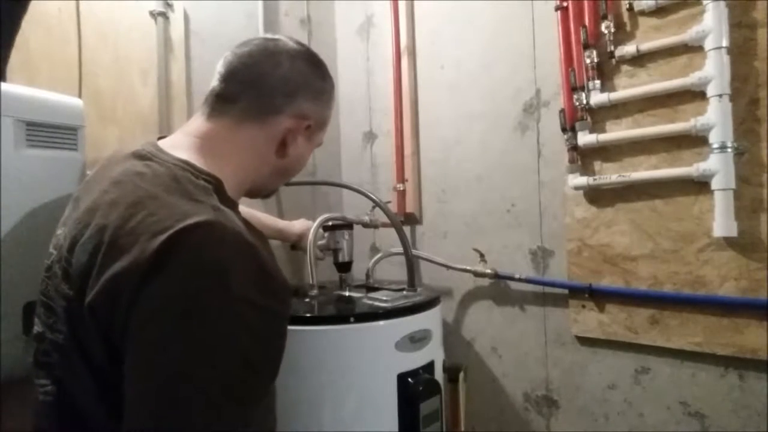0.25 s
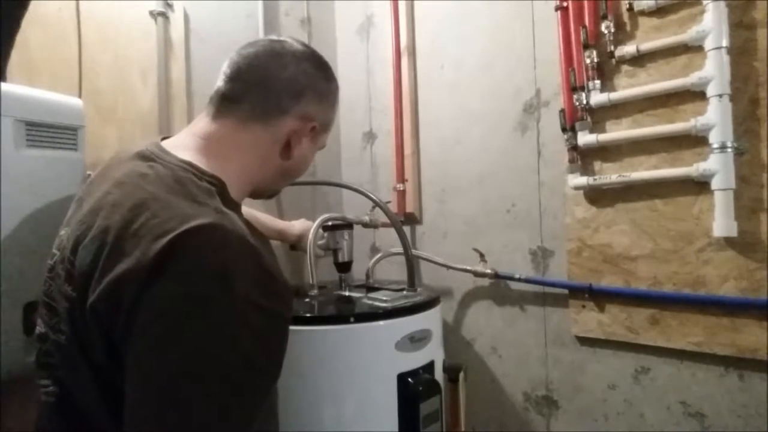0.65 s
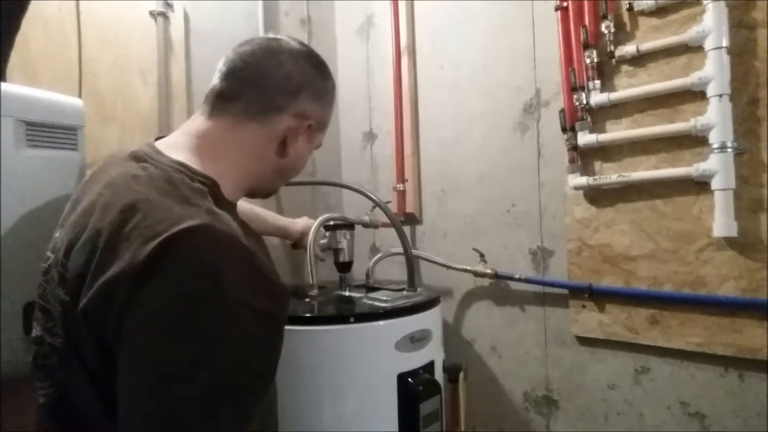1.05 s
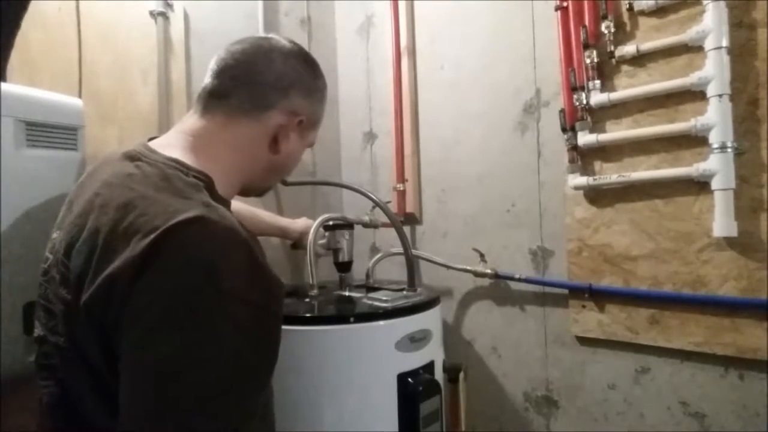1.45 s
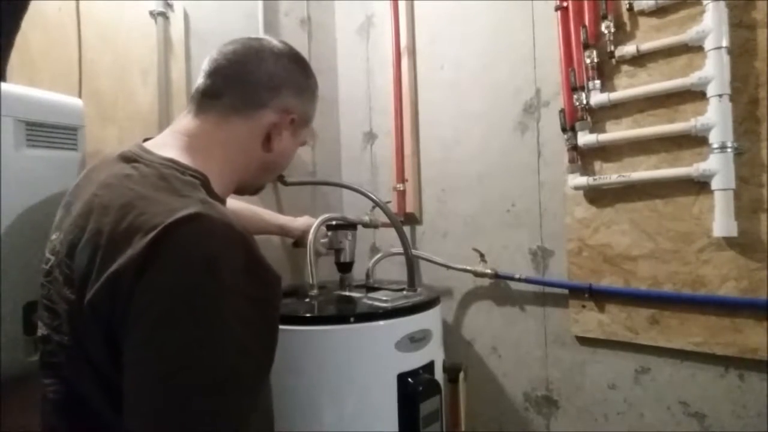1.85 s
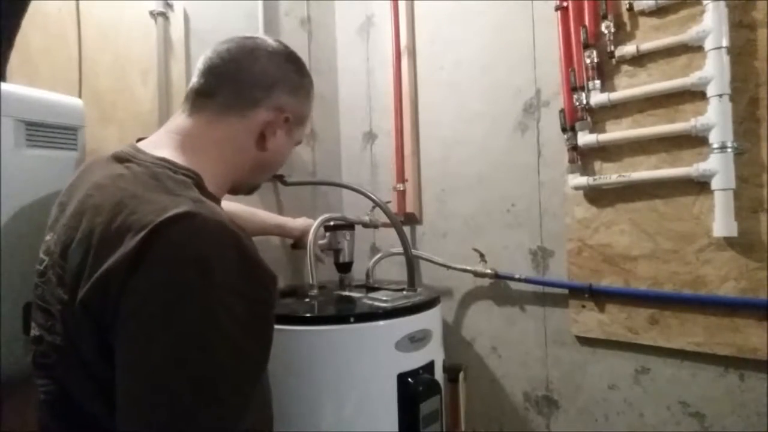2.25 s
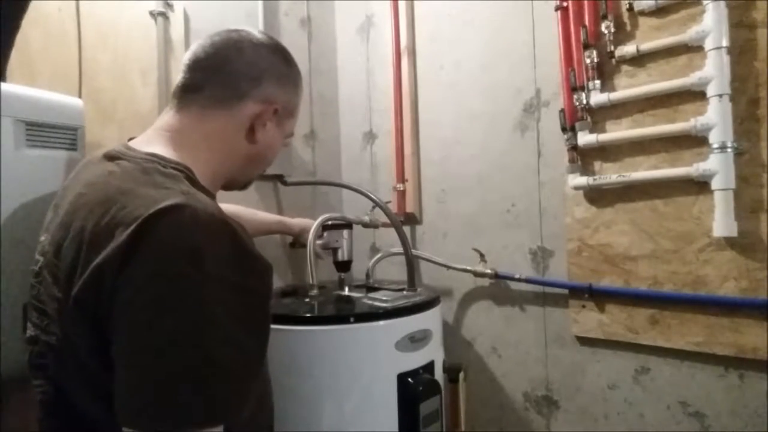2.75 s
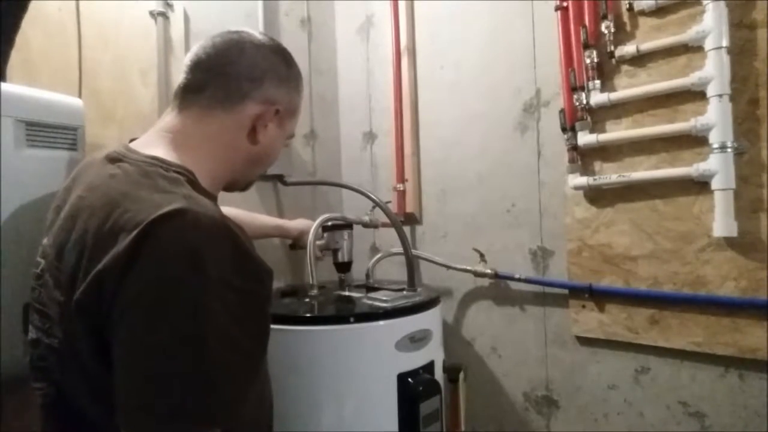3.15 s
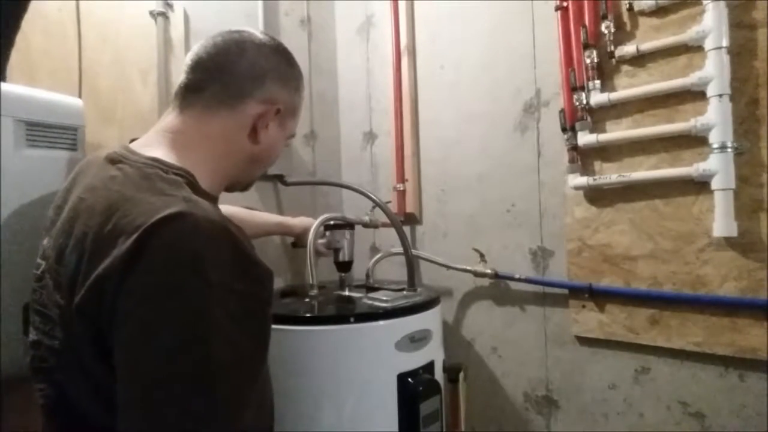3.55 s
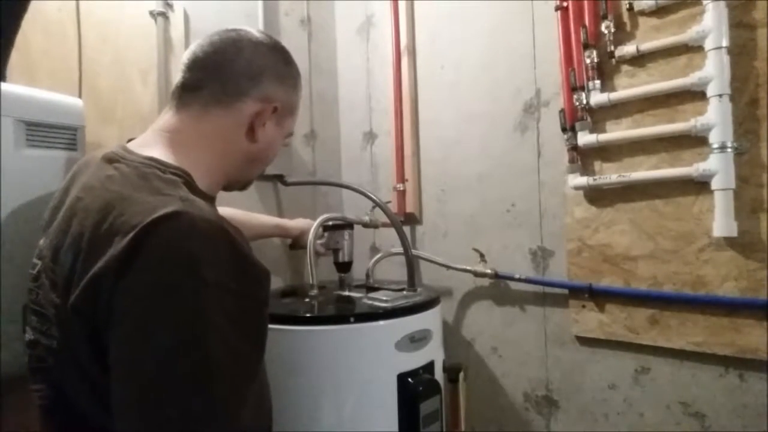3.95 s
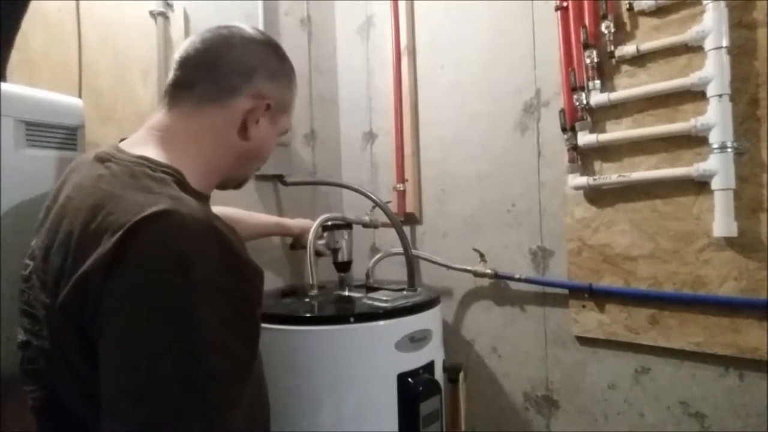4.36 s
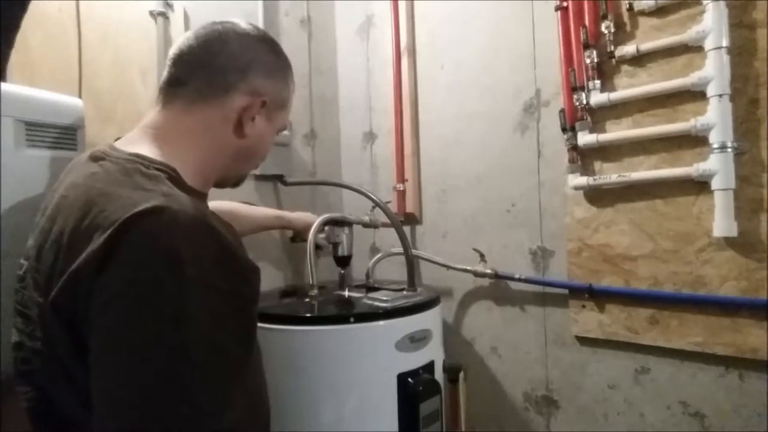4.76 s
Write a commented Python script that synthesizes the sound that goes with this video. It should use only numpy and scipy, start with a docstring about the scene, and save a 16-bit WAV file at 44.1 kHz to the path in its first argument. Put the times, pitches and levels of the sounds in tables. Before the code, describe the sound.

Faint, steady room noise fills a concrete basement with a short echo. At about 0.45 seconds a nearby air impact wrench starts with a jolt: hissing exhaust, a rising rotor growl and chattering hammer blows, while a rusty rod grinds in the top of a metal water tank. It stops near 1 second with a clack and a rattle. A second burst runs from 1.5 to 2.1 seconds, ending in two hard clacks and a dull socket scuff. The tank shell hums low and fades through the pause, with a faint trigger tick at 2.4 and a soft scuff at 3 seconds. Two quick blips come at 3.4 and 4 seconds, each coasting down with several sharp clacks as the loose rod rattles against its opening. A last small rattle comes at about 4.45, and the hum dies away by 5 seconds.

```python
"""Concrete basement: an air impact wrench spins a metal rod out of a water tank's top, in four bursts.
Trigger held: the exhaust hisses, the rotor growls, the hammer chatters. Released: the rotor coasts
down with a few clacks. The rod grinds in its rusty thread and rattles as it slows; the tank shell
hums on between bursts. Socket scuffs and trigger ticks sound faintly over still air."""
import sys
import numpy as np
from scipy import signal
from scipy.fft import rfft, irfft, next_fast_len
from scipy.io import wavfile

SR = 44100
rng = np.random.default_rng(int(sys.argv[2]) if len(sys.argv) > 2 else 0)


def unload_wav(signal):
    """Save mono or channel-first audio to the path in sys.argv[1] as 16-bit WAV at rate SR, clipped to [-1, 1]."""
    wavfile.write(
        sys.argv[1],
        SR,
        np.round(np.clip(np.atleast_2d(signal).T, -1, 1) * 32767).astype(np.int16),
    )


N = 221117
TIME = np.arange(N) / SR

# Event and mode levels are relative within each table.
# trigger pulls: on_s, off_s, flow_db, spin_up_s, top_hz, coast_s, jolt_db
TRIGGER_PULLS = [(0.445, 0.94, -19, 0.13, 481, .07, -16), (1.458, 2.065, -19, 0.094, 477.5, .07, -17),
                 (3.439, 3.583, -21.5, .06, 349, .17, -16.5),
                 (3.97, 4.112, -19.5, 0.060258, 350, .17, -19.5)]
# hard hammer clacks: start_s, level_db
HAMMER_CLACKS = [(.508, 3.5), (.602, 4.5), (.991, 4.5), (2.045, 11.5), (2.148, 7.5), (3.545, 1.5),
                 (3.600, 6.5), (3.651, 9), (4.137, 6.5), (4.193, 7), (4.272, 6), (4.419, -27.5),
                 (4.445, -21.5)]
# socket scuffs on the rod: start_s, level_db
SOCKET_SCUFFS = [(0.062, -60.5), (2.099, -27.5), (2.997, -49.5), (4.68, -66.5), (4.995, -70)]
# trigger springs back: start_s, level_db
TRIGGER_TICKS = [(1.167, -50), (2.365, -54)]
# loose rod drops against its port: start_s, level_db
ROD_DROPS = [(1.018, -3.5), (3.683, 5.5), (4.168, 0.5), (4.207, 0.5), (4.297, -1.5), (4.446, -9)]
# rod turns: start_s, stop_s, full_db, growth_db, rise_s
ROD_TURNS = [(0.453, 0.994, -25, 16.5, 0.39), (1.456, 2.15, -28.5, 4.5, 0.085),
             (3.446, 3.723, -35.5, 9.5, 0.15), (3.979, 4.28, -32.5, 11, 0.13)]
# thread binds: centre_s, boost_db
THREAD_BINDS = [(.53, 4.5), (.88, 2), (1.65, 5), (1.77, 6.5), (2.095, 1.5), (4.205, 3.5)]
# shell booms as the rod jerks: start_s, level_db
SHELL_BOOMS = [(.45, -35.5), (.655, -31.5), (.885, -35), (1.46, -35), (1.675, -38.5), (2.15, -33.5),
               (3.435, -38.5), (4.15, -41.5), (4.255, -36.5)]
# shell rings after a burst or a reseating of the socket: start_s, level_db, fade_db_per_s
SHELL_RINGS = [(1.0, -39, 59), (2.2, -39.5, 17.5), (3.06, -53.5, -1), (3.76, -46.5, 34), (4.38, -46, 30.5)]

# higher tank shell modes: freq_hz, level_db, t60_s
SHELL_MODES = [(255, -12, 0.67), (367, -6.5, 0.81), (375.3, -24, 2.2), (447, -17, 0.69), (505.8, 4.5, 0.23),
               (634, 3, 0.4), (704, -5.5, 0.18), (877, -46.5, 3), (1057, -4.5, .3), (1442, -0.5, .2)]
# trigger spring modes: freq_hz, level_db, t60_s
SPRING_MODES = [(5450, -6.5, .16), (5560, -1, .14), (5840, 4, .12), (6471, -25.5, .1)]

# still air: freq_hz, gain_db
AIR_SPECTRUM = [(12, -26), (25, -12), (45, -1.5), (65, -7), (100, -3.5), (200, -8.5), (300, -15.5),
                (450, -19), (700, -29), (1000, -34), (3000, -43.5), (16000, -44)]
# socket scuff: freq_hz, gain_db
SCUFF_SPECTRUM = [(60, -14), (250, -9.5), (420, 8), (520, 9.5), (750, -4.5), (1200, -19.5), (2500, -34),
                  (6000, -44), (16000, -62)]
# exhaust jet: freq_hz, gain_db
EXHAUST_SPECTRUM = [(40, -26.5), (150, -11.5), (400, -13.5), (1000, -10), (2100, -8.5), (2900, -3.5),
                    (4300, -11), (5100, -5.5), (5700, -3), (6500, -5.5), (8000, -0.5), (10000, 3),
                    (12500, 1.5), (16000, -1)]
# jolted lid: freq_hz, gain_db
JOLT_SPECTRUM = [(20, -37.5), (40, -18.5), (65, -7), (110, 2), (200, -6), (330, -23), (1000, -37),
                 (16000, -68)]
# rod and thread: freq_hz, gain_db
THREAD_SPECTRUM = [(40, -34), (100, -11), (190, -4), (310, -16), (440, 3), (510, -1), (580, -3.5),
                   (800, -4), (1500, -7), (2200, -14), (3000, -14), (6000, -27), (16000, -32)]
# steel contact: freq_hz, gain_db
STEEL_SPECTRUM = [(100, -19), (500, -13.5), (1500, -7.5), (2900, -2), (4200, -4), (5700, -1), (7500, 0.5),
                  (10500, 4.5), (16000, 6)]
# rod against its port: freq_hz, gain_db
RATTLE_SPECTRUM = [(60, -14.5), (250, -13), (450, 3.5), (800, 0), (1500, -1.5), (2200, -3), (3500, -18),
                   (7000, -11.5), (16000, -22)]

# basement decay: freq_hz, t60_s
ROOM_DECAY = [(100, 0.32), (500, 0.29), (1500, 0.23), (4000, 0.17), (10000, 0.22), (16000, .17)]
# left-right likeness of diffuse sound: freq_hz, correlation
STEREO_LIKENESS = [(120, 0.38), (300, .65), (600, 0.29), (1500, .2), (4000, 0.061), (16000, 0)]
# body shadow: freq_hz, left_minus_right_db
SHADOW_BALANCE = [(120, -1), (450, 6), (700, 1.5), (1000, -1), (1350, 6.5), (2100, 2.5), (3100, 5.5),
                  (4700, 12.5), (5800, 14.5), (7500, 6.5), (9500, 1), (12000, -1.5), (15500, 4)]


def from_db(db):
    """Decibels to gain."""
    return 10 ** (np.asarray(db) / 20)


def rms_one(x):
    """Scale to rms 1."""
    return x / np.sqrt(np.mean(x ** 2) + 1e-20)


def at_hz(table, hz):
    """Interpolate a table over log frequency."""
    freqs_hz, values = np.transpose(table)
    return np.interp(np.log(np.maximum(hz, 1)), np.log(freqs_hz), values)


def drift(rate_hz):
    """Random wander, rms 1."""
    knots = rng.standard_normal(int(rate_hz * N / SR) + 2)
    return rms_one(np.interp(TIME * rate_hz, np.arange(len(knots)), knots))


def colour(x, spectrum):
    """Minimum-phase filter; white noise keeps its power."""
    length = x.shape[-1]
    size = 2 * next_fast_len(length // 2 + SR // 10)
    gain = rms_one(from_db(at_hz(spectrum, np.fft.rfftfreq(size, 1 / SR))))
    cepstrum = irfft(np.log(gain))
    cepstrum[1:size // 2] *= 2
    cepstrum[size // 2 + 1:] = 0
    return irfft(rfft(x, size) * np.exp(rfft(cepstrum, size)))[..., :length]


def ring(force, hz, t60_s):
    """One mode: a unit click starts a decaying sine of height 1."""
    radius, step_rad = from_db(-60 / (t60_s * SR)), 2 * np.pi * hz / SR
    feedback = [1, -2 * radius * np.cos(step_rad), radius ** 2]
    return signal.lfilter([0, np.sin(step_rad)], feedback, force + 1e-18)


def clicks(times_s, levels_db):
    """Hard contacts as single impulses."""
    out = np.zeros(N)
    out[np.clip(np.round(np.asarray(times_s) * SR).astype(int), 0, N - 1)] = from_db(levels_db)
    return out


def strikes(times_s, levels_db, decay_s):
    """Contacts as decaying noise bursts."""
    pole = np.exp(-1 / (decay_s * SR))
    envelope = signal.lfilter([1], [1, -pole], clicks(times_s, levels_db) + 1e-18)
    return envelope * rng.standard_normal(N)


def swell(start_s, rise_s, fade_db_per_s):
    """Linear rise to 1, then a constant slope in dB."""
    age_s = TIME - start_s
    return np.clip(age_s / rise_s, 0, 1) * from_db(-fade_db_per_s * np.maximum(age_s - rise_s, 0))


def stereo_noise(size):
    """White noise pair, alike mainly in the bass."""
    mid, side = rfft(rng.standard_normal((2, size)))
    alike = np.clip(at_hz(STEREO_LIKENESS, np.fft.rfftfreq(size, 1 / SR)), -1, 1)
    return irfft(np.sqrt(1 + alike) * mid + np.sqrt(1 - alike) * side * [[1], [-1]], size)


def basement(x, spectrum, direct_db, near_db=-20, near_s=0.0012, right_lag_samples=20):
    """One source's coloured path: direct sound, scatter off the lid, a tail shorter in the treble."""
    size = SR // 2
    hz = np.fft.rfftfreq(size, 1 / SR)
    noise = rfft(stereo_noise(size))
    edges_hz = np.geomspace(20, SR / 2, 11)
    path = 0
    for low, high in zip(edges_hz, edges_hz[1:]):
        band = irfft(noise * (hz >= low) * (hz < high), size)
        fade = np.exp(-np.log(1000) * TIME[:size] / at_hz(ROOM_DECAY, np.sqrt(low * high)))
        path += band * fade / np.linalg.norm(fade)
    near = np.exp(-TIME[:size] / near_s)
    path += from_db(near_db) * stereo_noise(size) * near / np.linalg.norm(near)
    path[[0, 1], [0, right_lag_samples]] += from_db(direct_db)
    path = colour(path, spectrum) / np.linalg.norm(from_db([0, direct_db, near_db]))
    return signal.fftconvolve(x[None], path, axes=1)[:, :N]


def body_shadow(x):
    """A body in front shades the right side."""
    size = next_fast_len(N + SR // 10)
    balance_db = at_hz(SHADOW_BALANCE, np.fft.rfftfreq(size, 1 / SR))
    return irfft(rfft(x, size) * from_db(balance_db * [[.5], [-.5]]), size)[:, :N]


def still_air(level_db):
    """Faint, steady low room noise."""
    return from_db(level_db) * colour(stereo_noise(N), AIR_SPECTRUM)


def shell_hum(force, mode_hz, idle_db, driven_db, throb_db, waver, damp_db_per_s):
    """Lowest shell mode: idles, throbs with the grinding, booms at jerks, rings until the next pull."""
    power = (force * from_db(driven_db + throb_db * drift(22))) ** 2 + from_db(idle_db) ** 2
    for start_s, db in SHELL_BOOMS:
        power += (from_db(db) * swell(start_s, rise_s=0.021, fade_db_per_s=138.5)) ** 2
    for start_s, db, fade_db_per_s in SHELL_RINGS:
        next_pull_s = min([on_s for on_s, *_ in TRIGGER_PULLS if on_s > start_s], default=np.inf)
        damped_db = damp_db_per_s * np.maximum(TIME - next_pull_s, 0)
        ring_out = swell(start_s, rise_s=.04, fade_db_per_s=fade_db_per_s)
        power += (from_db(db - damped_db) * ring_out) ** 2
    turning = sum((TIME >= start_s) & (TIME <= stop_s) for start_s, stop_s, *_ in ROD_TURNS)
    pitch_hz = mode_hz * (1 + waver * turning * drift(25))
    hum = np.sqrt(2 * power) * np.sin(2 * np.pi * np.cumsum(pitch_hz) / SR)
    return hum * from_db([[.4], [-.4]])


def socket_scuffs(gain_db):
    """The socket rubs the rod in dull knocks."""
    scuffs = strikes(*np.transpose(SOCKET_SCUFFS), decay_s=.018)
    return from_db(gain_db) * basement(scuffs, SCUFF_SPECTRUM, direct_db=-2.5)


def throttle(open_s, shut_s, flow_exponent):
    """Flow and vane rate rise on each pull; on release the valve shuts fast and the rotor coasts."""
    flow, vane_hz = 0, 0
    for on_s, off_s, flow_db, spin_up_s, top_hz, coast_s, _ in TRIGGER_PULLS:
        held_s = np.clip(TIME - on_s, 0, off_s - on_s)
        released_s = np.maximum(TIME - off_s, 0)
        speed = 1 - np.exp(-held_s / spin_up_s)
        valve = (1 - np.exp(-held_s / open_s)) * np.exp(-released_s / shut_s)
        flow += from_db(flow_db) * valve * speed ** flow_exponent
        vane_hz += top_hz * speed * np.exp(-released_s / coast_s)
    return flow, vane_hz


def exhaust(flow, cycles, chop, flutter_db, ports):
    """One puff of air per vane; each port has its own room path."""
    puffs = flow * (1 + chop * np.cos(2 * np.pi * cycles)) * from_db(flutter_db * drift(150))
    jets = [basement(puffs * rng.standard_normal(N), EXHAUST_SPECTRUM, direct_db=-5)
            for _ in range(ports)]
    return sum(jets) / np.sqrt(ports)


def rotor_growl(vane_hz, cycles, gain_db, overtone_step_db, fade_below_hz):
    """Harmonics of the vane passing rate glide with the speed."""
    tone = sum(from_db(overtone_step_db * k) * np.sin(2 * np.pi * (k + 1) * cycles) for k in range(4))
    spinning = 1 - np.exp(-(vane_hz / fade_below_hz) ** 4)
    return basement(from_db(gain_db) * tone * spinning, [(20, 0.0079), (20000, 0)], direct_db=-3)


def lid_jolts(gain_db, decay_s):
    """Each rotor start jolts the lid."""
    on_s, *_, jolt_db = np.transpose(TRIGGER_PULLS)
    return from_db(gain_db) * basement(strikes(on_s, jolt_db, decay_s), JOLT_SPECTRUM, direct_db=4.5)


def thread_force(bind_s, run_out_db_per_s):
    """Friction grows as the rod picks up, peaks at binds, dies when the rod stops."""
    force = 0
    for start_s, stop_s, full_db, growth_db, rise_s in ROD_TURNS:
        slack = np.clip(1 - (TIME - start_s) / rise_s, 0, 1)
        run_out_db = run_out_db_per_s * np.maximum(TIME - stop_s, 0)
        force += (TIME >= start_s) * from_db(full_db - growth_db * slack - run_out_db)
    bind_db = sum(db * np.exp(-((TIME - centre_s) / bind_s) ** 2) for centre_s, db in THREAD_BINDS)
    return force * from_db(bind_db)


def grinding(force, slips_per_s, spread_db, gain_db, shell_db):
    """The rusty thread sticks and slips, shaking the lid and ringing the higher shell modes."""
    sizes = from_db(spread_db * np.minimum(rng.exponential(1, N), 4)) * rng.choice([-1, 1], N)
    slips = rms_one(sizes * (rng.random(N) < slips_per_s / SR))
    jerks = from_db(gain_db) * force * slips
    shell = sum(from_db(db + shell_db) * ring(jerks, hz, t60_s) for hz, db, t60_s in SHELL_MODES)
    return basement(jerks, THREAD_SPECTRUM, direct_db=-0.5) + shell


def hammer(flow, cycles, cycles_per_blow, blow_db, bounce_s, thud_db):
    """The hammer hits the anvil once a turn and bounces; single hard clacks also thud down the rod."""
    blow_samples = np.flatnonzero(np.diff(np.floor(cycles / cycles_per_blow)) > 0)
    uneven_db = rng.uniform(-4, 4, N)[blow_samples]
    chatter = flow * strikes(blow_samples / SR, blow_db + uneven_db, bounce_s)
    first_catch_s = np.array(TRIGGER_PULLS)[:, 0] + .018
    clacks = clicks(*np.transpose(HAMMER_CLACKS)) + clicks(first_catch_s, levels_db=-2.5)
    thuds = from_db(thud_db) * basement(clacks, THREAD_SPECTRUM, direct_db=-10.5)
    return basement(chatter + clacks, STEEL_SPECTRUM, direct_db=-9, near_db=-9, near_s=0.0063) + thuds


def rod_rattle(gain_db, contacts, bounce_s, loss_db):
    """The loose rod drops against its port in ever weaker bounces."""
    drop_s, drop_db = np.transpose(ROD_DROPS)
    bounces = sum(clicks(drop_s + k * bounce_s, drop_db - k * loss_db) for k in range(contacts))
    return from_db(gain_db) * basement(bounces, RATTLE_SPECTRUM, direct_db=-1, near_db=-8.5)


def trigger_ticks(spring_db):
    """The trigger snaps back and its spring rings."""
    ticks = strikes(*np.transpose(TRIGGER_TICKS), decay_s=0.00088)
    spring = sum(from_db(db + spring_db) * ring(ticks, hz, t60_s) for hz, db, t60_s in SPRING_MODES)
    return basement(ticks + spring, STEEL_SPECTRUM, direct_db=-1.5)


def scene():
    """Wrench, rod and tank over still air, in stereo."""
    flow, vane_hz = throttle(open_s=0.0042, shut_s=0.029, flow_exponent=0.81)
    cycles = np.cumsum(vane_hz * (1 + .04 * drift(60))) / SR
    wrench = exhaust(flow, cycles, chop=.25, flutter_db=1.28, ports=4)
    wrench += hammer(flow, cycles, cycles_per_blow=10.5, blow_db=7, bounce_s=0.0016, thud_db=-18)
    wrench += rotor_growl(vane_hz, cycles, gain_db=-45, overtone_step_db=-6.5, fade_below_hz=123)
    wrench += lid_jolts(gain_db=-14.5, decay_s=0.031)
    force = thread_force(bind_s=.028, run_out_db_per_s=280.5)
    rod = grinding(force, slips_per_s=1500, spread_db=4.5, gain_db=-2.5, shell_db=-47.5)
    air = still_air(level_db=-74)
    hum = shell_hum(force, mode_hz=128.8, idle_db=-71, driven_db=-17.5, throb_db=4,
                    waver=0.02, damp_db_per_s=304)
    scuffs = socket_scuffs(gain_db=-1)
    rattle = rod_rattle(gain_db=-7.5, contacts=3, bounce_s=.017, loss_db=5)
    ticks = trigger_ticks(spring_db=-38)
    return body_shadow(wrench + rod + scuffs + rattle + ticks) + hum + air


def record(dry):
    """Steep low-pass."""
    cutoff_hz = 15850
    return signal.sosfilt(signal.ellip(12, .2, 80, cutoff_hz, fs=SR, output="sos"), dry)


dry = scene()
out = record(dry)
unload_wav(out)
```